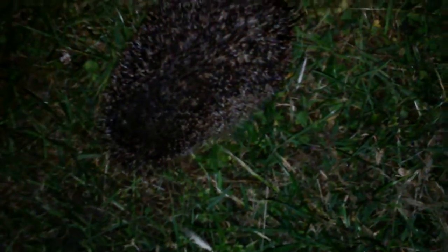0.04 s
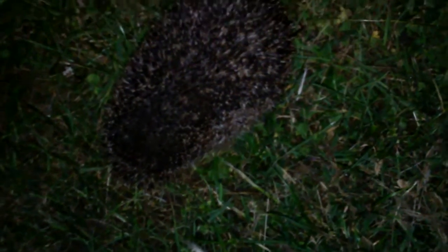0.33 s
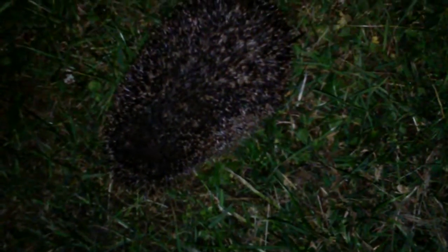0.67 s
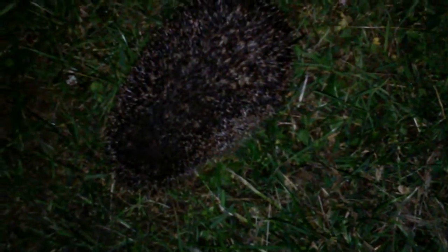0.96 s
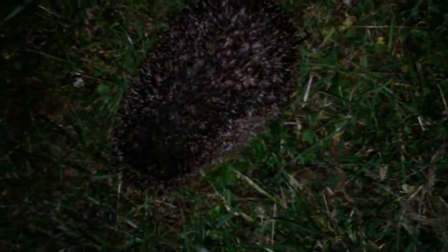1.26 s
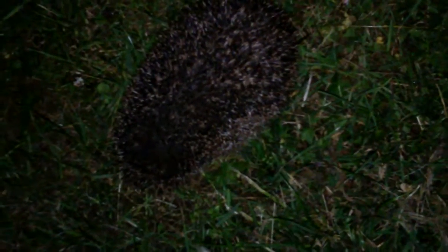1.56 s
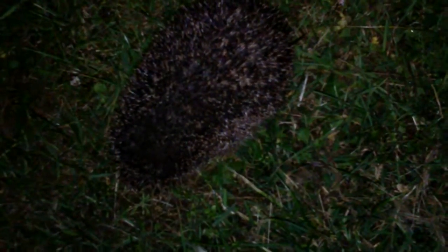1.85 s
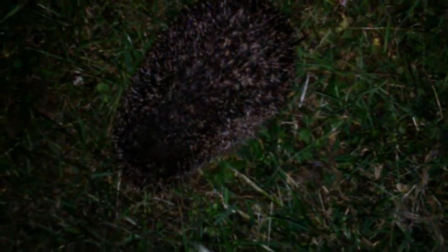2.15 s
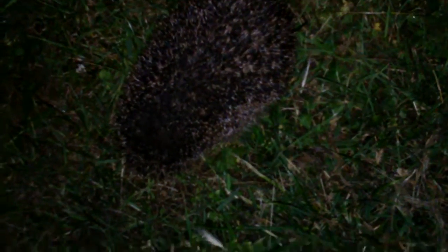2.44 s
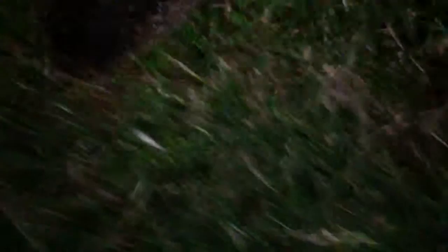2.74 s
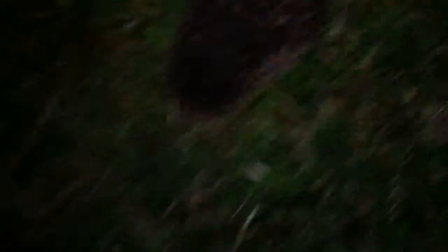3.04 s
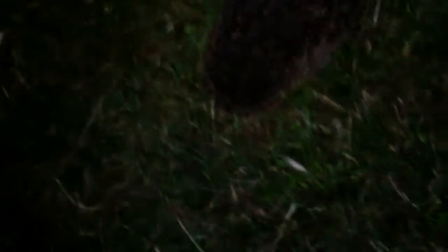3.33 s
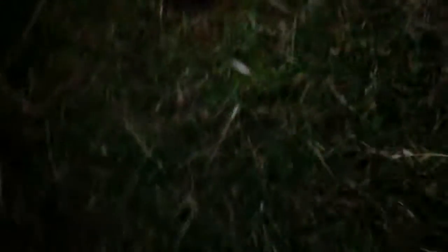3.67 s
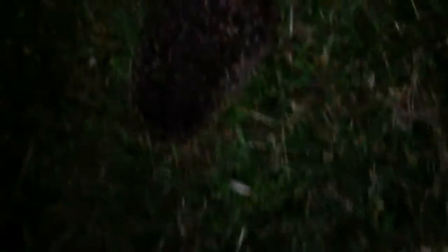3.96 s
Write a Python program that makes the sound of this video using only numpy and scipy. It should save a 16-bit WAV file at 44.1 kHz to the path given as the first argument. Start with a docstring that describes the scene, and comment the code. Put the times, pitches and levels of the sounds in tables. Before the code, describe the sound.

Handling noise on a hand-held camera: a low, uneven rumble with dull bumps. Three small ticks and a soft brushing rustle follow, then a cluster of heavier bumps, over faint outdoor air and microphone hiss.

```python
"""On a lawn on a still night, a hand-held camera follows a hedgehog. What is heard is handling noise.
As the grip shifts, friction of the skin sends a low rumble through the camera body, and soft pushes
give dull bumps. The casing slips and snaps in three small ticks, and fibres catch and let go in a few
soft brushing rustles. Behind them lie faint outdoor air and the microphone's own hiss."""
import sys
import numpy as np
from scipy import signal
from scipy.fft import rfft, irfft
from scipy.io import wavfile
from scipy.ndimage import uniform_filter1d

SR = 44100
rng = np.random.default_rng(int(sys.argv[2]) if len(sys.argv) > 2 else 0)


def inscribe(sig):
    """Save sig as 16-bit PCM at rate SR to the path in sys.argv[1].

    A 1-D sig is mono; a 2-D sig holds one channel per row.
    Samples are clipped to [-1, 1] before scaling.
    """
    pcm = np.round(np.clip(np.atleast_2d(sig).T, -1, 1) * 32767)
    wavfile.write(sys.argv[1], SR, pcm.astype(np.int16))


N = 4 * SR


def amp(db):
    """Amplitude ratio: a factor of ten for every 20 dB."""
    return 10 ** (np.asarray(db) / 20)


def unit_rms(x):
    """Normalisation to an rms of 1."""
    return x / np.sqrt(np.mean(x ** 2) + 1e-20)


def add(mix, start_s, sound):
    """Superposition: a sound adds to the mix from its start time on."""
    part = mix[max(round(start_s * SR), 0):][:len(sound)]
    part += sound[:len(part)]


def coloured(x, spectrum):
    """Minimum-phase filtering: the phase follows from the log gain by a Hilbert transform."""
    hz, db = np.transpose(spectrum)
    bin_hz = abs(np.fft.fftfreq(len(x), 1 / SR))
    log_gain = np.log(amp(np.interp(np.log(bin_hz + 1), np.log(hz), db)))
    response = np.exp(np.conj(signal.hilbert(log_gain)))
    return np.fft.ifft(np.fft.fft(x) * response).real


def drift(seconds):
    """Low-passed noise: a random fluctuation of rms 1 on the given time scale."""
    hz = np.fft.rfftfreq(N, 1 / SR)
    low_pass = np.exp(-(2 * hz * seconds) ** 2)
    return unit_rms(irfft(rfft(rng.standard_normal(N)) * low_pass, N))


# Strength of the rumble as the grip shifts. Each row: time in seconds, relative level in dB.
GRIP_LEVELS = [(0, -49), (.07, -45), (.15, -43), (.23, -48), (.27, -44), (.37, -51.5), (.47, -41.5),
               (.53, -46.5), (0.691, -36), (.77, -60), (1.19, -55.5), (1.3, -49.5), (1.355, -39),
               (1.42, -48.5), (1.59, -45), (1.63, -61), (1.79, -52.5), (1.87, -40.5), (1.91, -49),
               (1.96, -42.5), (2.1, -48), (2.25, -42), (2.3, -54), (2.34, -38.5), (2.45, -40),
               (2.49, -51.5), (2.68, -58), (2.75, -44.5), (2.85, -58.5), (2.97, -53), (3.02, -39),
               (3.15, -33), (3.22, -39), (3.36, -38), (3.51, -53), (3.56, -41), (3.64, -56), (3.82, -45.5),
               (3.89, -56), (3.94, -39), (4, -75)]
# Spectrum of the rumble. Each row: frequency in Hz, relative spectral density in dB.
RUMBLE_SPECTRUM = [(15, -63), (28, -24.5), (42, -3.5), (62, 5.5), (85, -4.5), (115, -9.5), (180, -21.5),
                   (260, -32.5), (330, -38), (430, -43.5), (800, -71.5)]


def grip_rumble():
    """Friction noise: skin creeping on the camera body makes a lumpy rumble that follows the grip."""
    lift_db, lumps_db = 1.5, 2
    creep = coloured(rng.standard_normal(N), RUMBLE_SPECTRUM)
    local_power = uniform_filter1d(abs(signal.hilbert(creep)) ** 2, size=2600) / 2
    creep /= np.sqrt(local_power)  # evens out the noise's own swells
    grip_db = np.interp(np.arange(N) / SR, *np.transpose(GRIP_LEVELS))
    smooth_db = uniform_filter1d(grip_db, size=500)
    return creep * amp(smooth_db + lift_db + lumps_db * drift(seconds=0.021))


# Pushes of the hand. Each row: time of the peak in seconds, level in dB, width in seconds.
HAND_PUSHES = [(.055, -23, 0.0044), (0.107, -30, 0.0061), (0.132, -29.5, 0.0037), (0.438, -32, 0.0032),
               (0.64, -34, 0.0038), (.685, -33, 0.0097), (1.518, -33, 0.004), (2.145, -26.5, 0.0052),
               (2.166, -43, 0.002), (2.339, -32, 0.0075), (2.404, -36.5, 0.0033), (2.445, -27.5, 0.0071),
               (3.027, -30, 0.0064), (3.094, -23, .004), (3.125, -19.5, 0.0061), (3.14, -21.5, 0.0036),
               (3.159, -18.5, 0.0047), (3.189, -20, 0.004), (3.245, -26.5, 0.0049), (3.298, -22, 0.005),
               (3.394, -25, 0.005), (3.931, -37.5, .007)]


def hand_bumps():
    """Damped oscillation: each soft push leaves the camera body wobbling briefly at its resonance."""
    body_hz, body_t60_s, body_share = 62, 0.21, 0.13
    out, t = np.zeros(N), np.arange(-SR // 20, SR // 5) / SR
    after = np.maximum(t, 0)
    wobble = -np.sin(2 * np.pi * body_hz * after) * amp(-60 * after / body_t60_s)
    for peak_s, db, width in HAND_PUSHES:
        u = t / width
        push = (1 - 3 * u ** 2) / (1 + u ** 2) ** 3  # a peak between two shallow troughs
        onset = 1 - np.exp(-(after / width) ** 2)
        add(out, peak_s + t[0], amp(db) * (push + body_share * wobble * onset))
    return out


# Ticks of the casing. Each row: time in seconds, snap gain in dB, ring gain in dB,
# treble edge in Hz, pitch of the spot that snaps in Hz.
CASING_TICKS = [(1.2938, -35.5, -47, 15500, 2000), (1.3743, -31.5, -44, 10000, 3200),
                (1.7085, -35.5, -58, 9000, 1750)]
# Spectrum of a snap. Each row: frequency in Hz, relative spectral density in dB.
SNAP_SPECTRUM = [(200, -12), (1000, -15), (2200, 6.5), (3000, -3), (3900, 0.5), (6000, 0.5), (9500, 3.5),
                 (11500, 8), (16000, -2)]
# Modes of the casing. Each row: frequency in Hz, relative level in dB, time to fall 60 dB in seconds.
CASING_MODES = [(402, 1, 0.028), (686, -1, 0.011), (1040, -6, 0.015), (2700, -13, 0.012)]


def casing_ticks():
    """Impulse excitation: a tiny slip ends in a snap, and the casing rings in its normal modes."""
    slip_s, slip_share = 0.0005, 0.2
    spot_db, spot_t60_s = -19, 0.0088
    out, t = np.zeros(N), np.arange(-SR // 100, SR // 10) / SR
    after, impulse = np.maximum(t, 0), t == 0
    ring = sum(amp(db - 60 * after / t60) * np.sin(2 * np.pi * hz * after)
               for hz, db, t60 in CASING_MODES)
    for snap_s, snap_db, ring_db, edge_hz, spot_hz in CASING_TICKS:
        spot = amp(spot_db - 60 * after / spot_t60_s) * np.cos(2 * np.pi * spot_hz * t) * (t >= 0)
        slip = slip_share * rng.standard_normal(len(t)) * np.exp(-abs(t) / slip_s)
        low_pass = signal.butter(4, edge_hz, fs=SR, output="sos")
        snap = signal.sosfilt(low_pass, coloured(slip + impulse, SNAP_SPECTRUM))
        add(out, snap_s + t[0], amp(ring_db) * ring - amp(snap_db) * (snap + spot))
    return out


# Brushing strokes. Each row: time of the peak in seconds, body level in dB, fizz level in dB,
# rise and fall time constants in seconds.
BRUSH_STROKES = [(1.95, -73, -70, .04, .07), (2.17, -67, -66, 0.02, 0.066),
                 (2.254, -55, -56.5, 0.026, 0.012), (2.29, -74, -64.5, 0.048, .025),
                 (2.412, -64, -60, 0.026, 0.032), (2.52, -71, -69.5, 0.057, 0.039)]
# Spectra of a rustle's body and fizz. Each row: frequency in Hz, relative spectral density in dB.
BODY_SPECTRUM = [(250, -19), (600, -2.5), (1000, 2), (1350, -3.5), (1800, 0), (2600, -14), (4300, -25),
                 (16000, -40)]
FIZZ_SPECTRUM = [(250, -21), (2000, 2), (3300, 3), (4400, 5), (5500, 1.5), (7500, 2), (10000, -2.5),
                 (16000, -7.5)]


def fibre_rustles():
    """Stick-slip friction: fibres catch and let go in short strokes with a dull body and a bright fizz."""
    catches_per_s, catch_share = 2300, 0.72
    out, t = np.zeros(N), np.arange(N) / SR
    peak_s, body_db, fizz_db, rise, fall = np.transpose(BRUSH_STROKES)[:, :, None]
    strokes = np.exp(-np.where(t < peak_s, (peak_s - t) / rise, (t - peak_s) / fall))
    for db, spectrum in (body_db, BODY_SPECTRUM), (fizz_db, FIZZ_SPECTRUM):
        catches = unit_rms(rng.standard_normal(N) * (rng.random(N) < catches_per_s / SR))
        friction = rng.standard_normal(N) + catch_share * catches
        envelope = np.linalg.norm(amp(db) * strokes, axis=0)  # overlapping strokes add in power
        out += envelope * unit_rms(coloured(friction, spectrum))
    return out


# Spectrum of the air and hiss. Each row: frequency in Hz, relative spectral density in dB.
AIR_SPECTRUM = [(20, 9.5), (55, 11.5), (110, 11.5), (200, 8), (320, 1.5), (450, -2.5), (620, -2),
                (800, -0.5), (1000, -.5), (1300, -5.5), (1700, -6), (2500, -8.5), (4500, -11.5),
                (9000, -13), (15500, -13)]


def air_and_hiss():
    """Broadband noise floor: a steady far-off wash of outdoor air and the microphone's self-noise."""
    level_db = -61 - 0.02 * drift(seconds=0.051)
    return amp(level_db) * unit_rms(coloured(rng.standard_normal(N), AIR_SPECTRUM))


def scene():
    """Superposition: all sources sum at one microphone."""
    return (air_and_hiss() + grip_rumble() + hand_bumps() + casing_ticks() + fibre_rustles())[None]


def record(dry):
    """Band limiting: the microphone cuts the deepest bass and the recorder the highest treble."""
    low_cut_hz, band_edge_hz = 36, 15850
    high_pass = signal.butter(4, low_cut_hz, "high", fs=SR, output="sos")
    low_pass = signal.firwin(511, band_edge_hz, window=("kaiser", 9), fs=SR)
    return signal.oaconvolve(signal.sosfilt(high_pass, dry), low_pass[None], "same")


dry = scene()
out = record(dry)
inscribe(out)
```